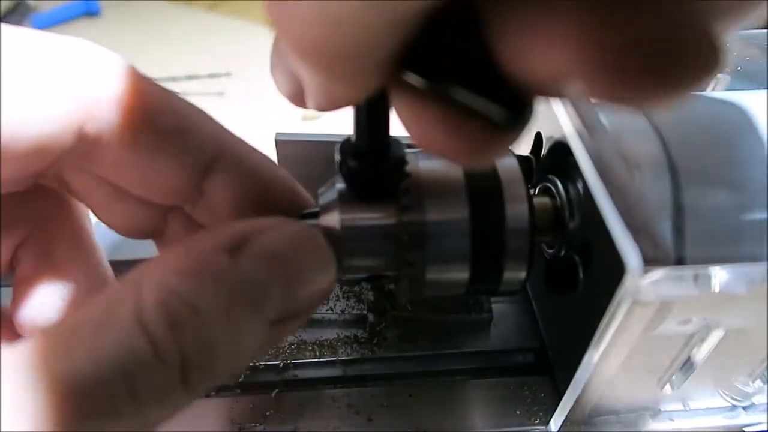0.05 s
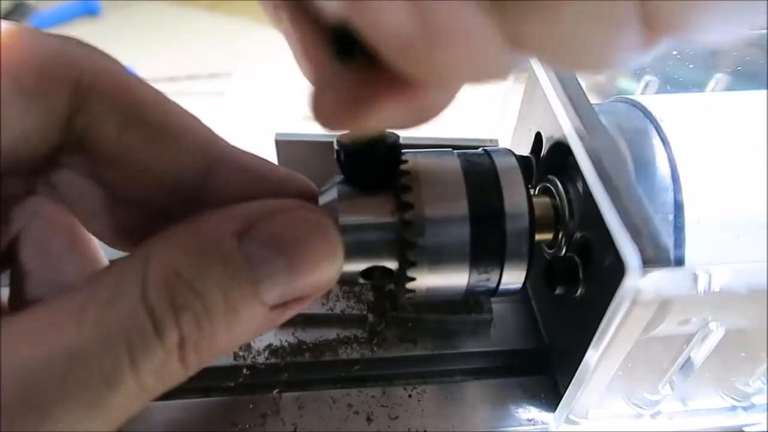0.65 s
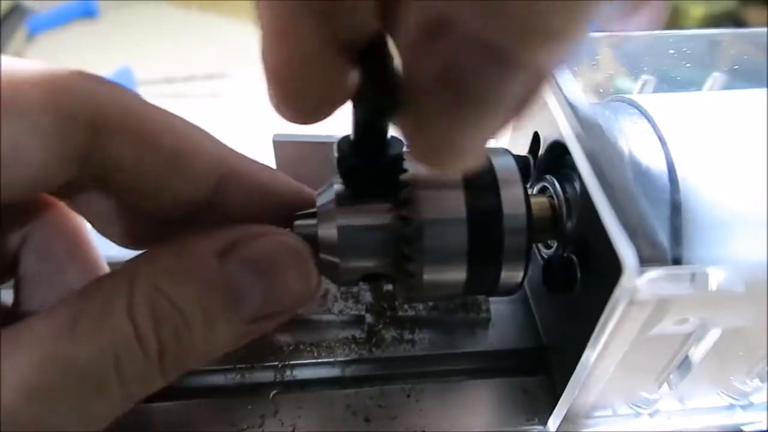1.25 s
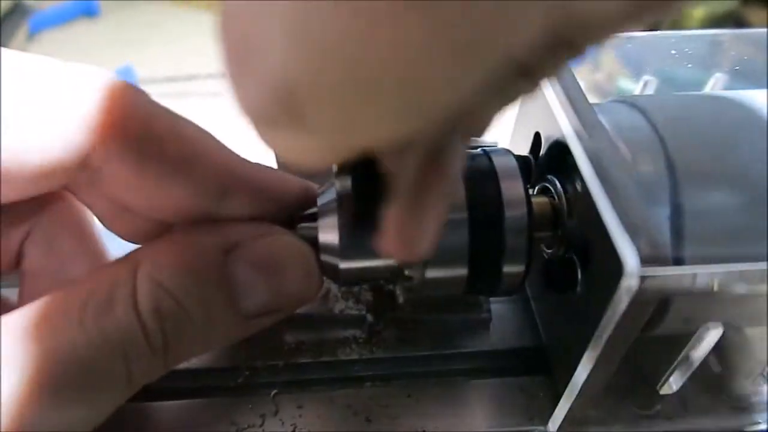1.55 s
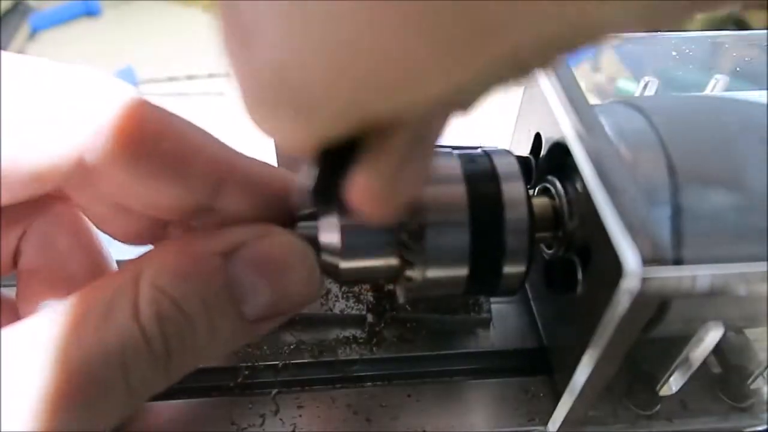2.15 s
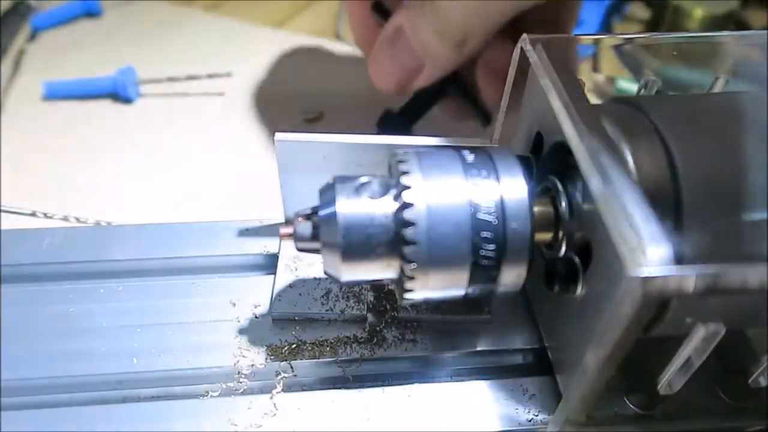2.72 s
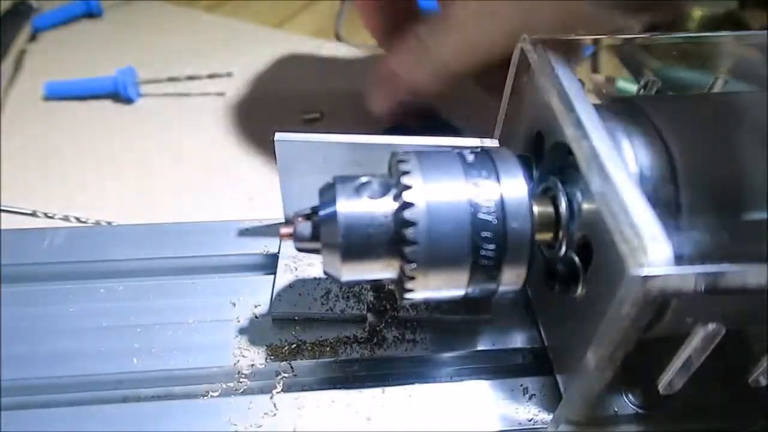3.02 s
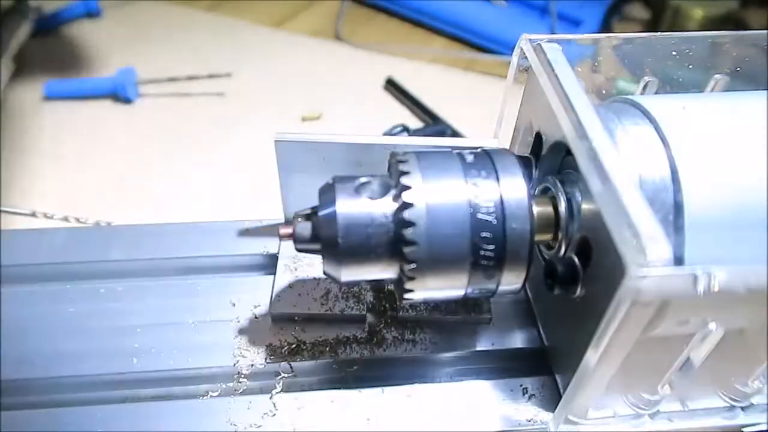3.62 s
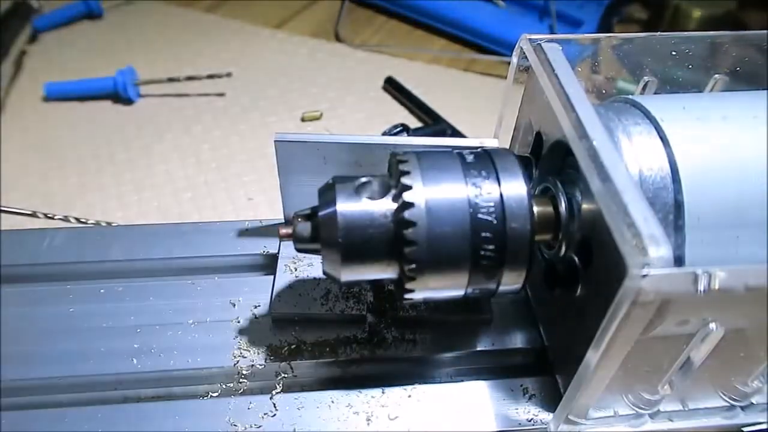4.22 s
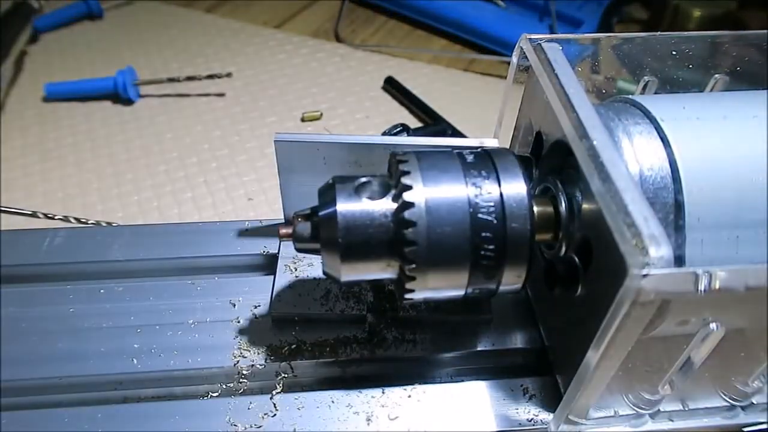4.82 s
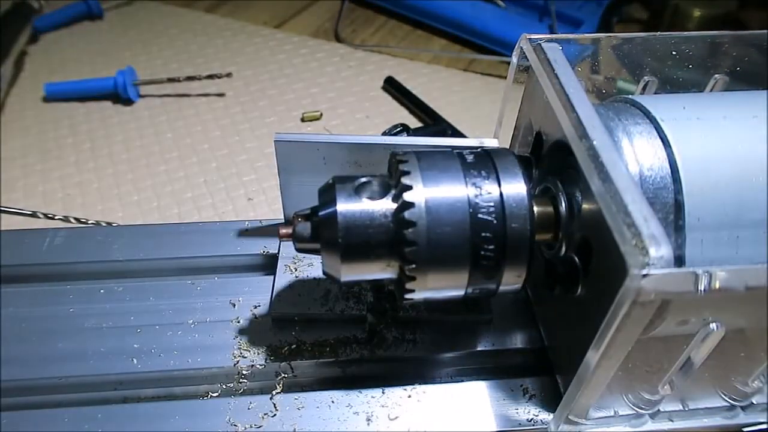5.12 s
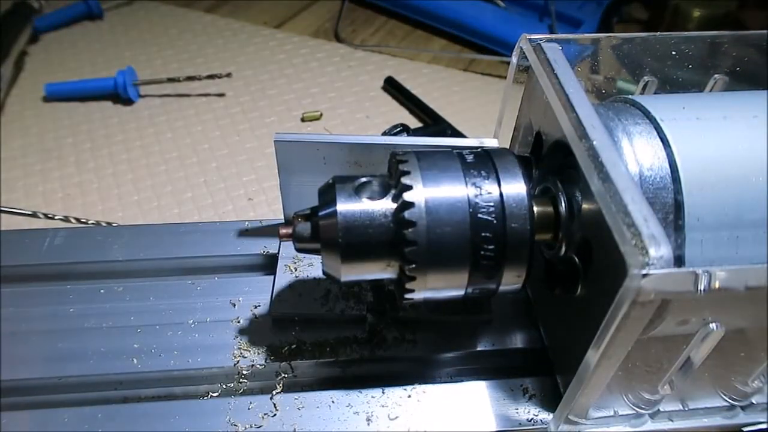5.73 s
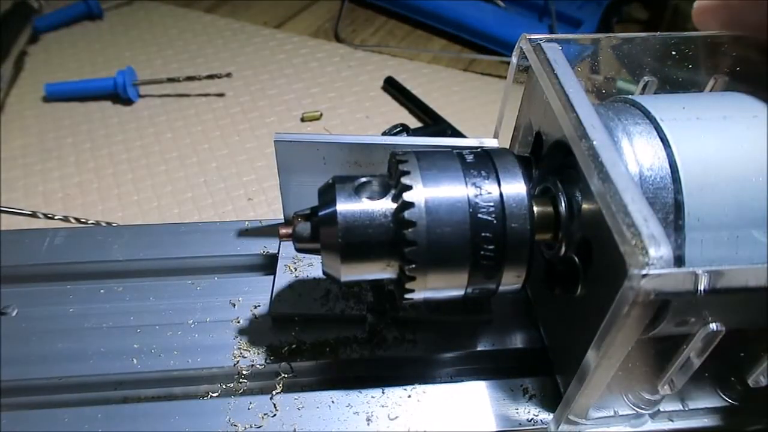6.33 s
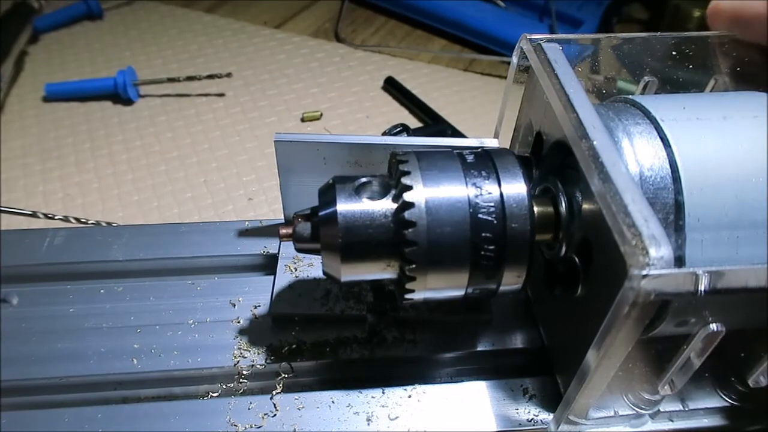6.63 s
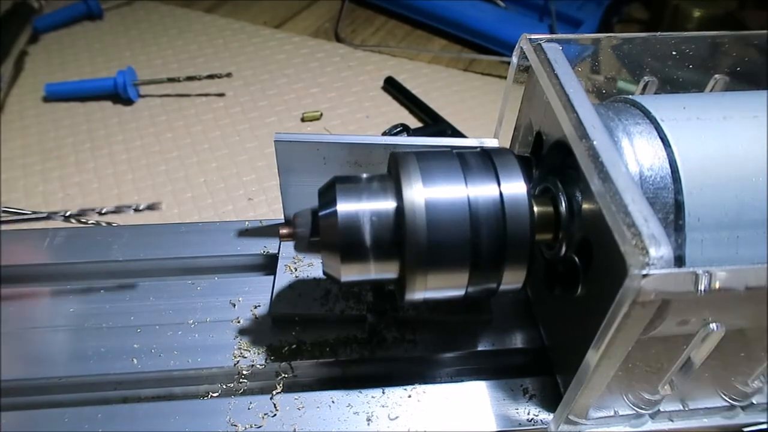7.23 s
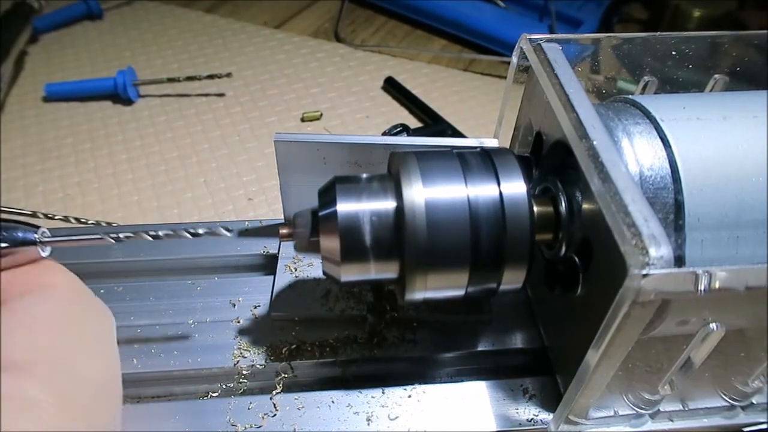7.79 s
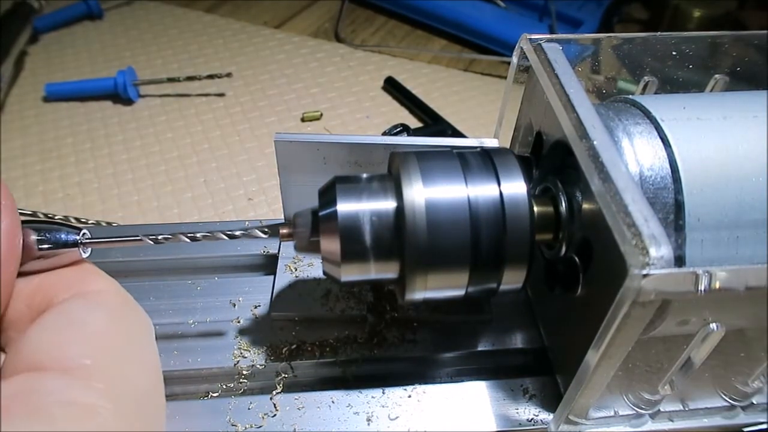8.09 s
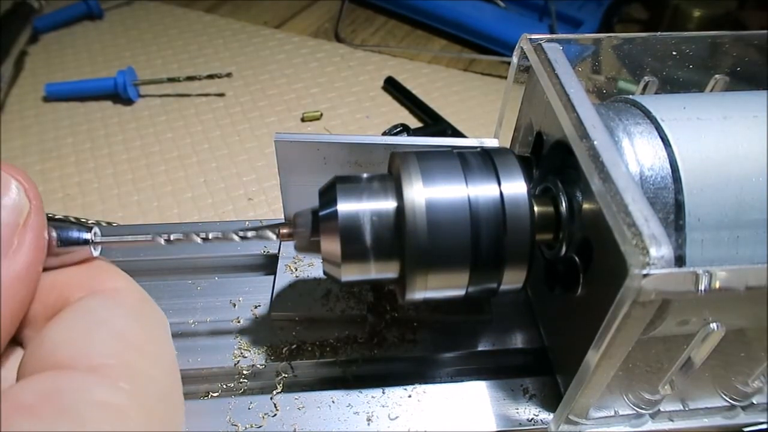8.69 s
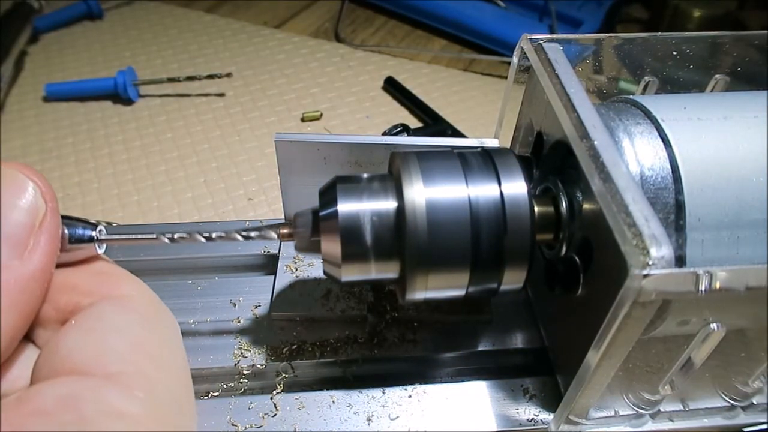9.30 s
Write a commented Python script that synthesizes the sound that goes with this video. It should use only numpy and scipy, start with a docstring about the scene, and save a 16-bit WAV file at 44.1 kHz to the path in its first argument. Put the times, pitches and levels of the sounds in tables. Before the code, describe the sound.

A chuck key clicks, something clatters on a bench, then a small lathe whines up, turns shrill and a drill bit cuts metal.

```python
"""A chuck key clicks, grinds and squeaks as it tightens the chuck of a mini lathe, and is put down.
Something hard clatters on the bench and judders to rest. A switch snaps, the motor starts with a clunk,
its unbalanced shaft hums and its ball bearing whines. Then the scene jumps to fast-forward, so the
whine turns shrill. Last, a hand-held drill bit skates on the spinning pin, bores in and sings."""
import sys
import numpy as np
from scipy import signal
from scipy.fft import rfft, irfft, next_fast_len
from scipy.io import wavfile
from scipy.ndimage import map_coordinates

SR = 44100
rng = np.random.default_rng(int(sys.argv[2]) if len(sys.argv) > 2 else 0)


def put_to_file(sound):
    """Save the sound as 16-bit audio at rate SR, in the file named by the first command-line argument."""
    columns = np.atleast_2d(sound).T  # one column per channel
    safe = np.clip(columns, -1, 1)
    whole_steps = np.round(safe * 32767)
    wavfile.write(sys.argv[1], SR, whole_steps.astype(np.int16))


N = 421155
T = np.arange(N) / SR
HIT_T = T[:SR // 2]  # half a second for each short sound
SIDES = np.array([[1], [-1]])  # left, right

START_S, SPIN_UP_S = 6.871, 0.036  # the motor gets power; time constant of its run-up
FULL_HZ = 130.55  # free shaft speed at normal pace; an "order" is a multiple of the shaft speed
JUMP_S, FAST = 7.581, 4  # start and pace of the fast-forward
CONTACT_S, SEAT_S = 8.54, 8.755  # the bit presses on the pin; it finds its centre and bores
TOP_HZ = 15780  # upper edge of the sound

# Tone colour of the workshop air: f/Hz, level/dB
AIR_COLOUR = [(12, -38), (20, -11.5), (43, 1.5), (115, -8.5), (147, -14.5), (205, -7), (302, -15.5),
              (337, -12), (525, -19), (1420, -27.5), (2770, -34), (3860, -37.5), (12400, -51), (15000, -67)]
# Steady background tones: f/Hz, level/dB
ROOM_HUM = [(53.8, -50.5), (119, -53), (199, -61), (12565, -79.5)]
# The bench top booms after blows: t/s, f/Hz, level/dB, t60/s (time to fade by 60 dB)
BENCH_BOOMS = [(0.294, 99.8, -36, 0.62), (4.654, 97, -28, 0.74), (5.244, 101.7, -27, 1.0)]
# Dull knocks on the bench: t/s, level/dB, f/Hz, t60/s
BENCH_KNOCKS = [(0.295, -17, 125, 0.04), (0.791, -34.5, 227, 0.15), (0.872, -32, 200, 0.14),
                (3.031, -27, 260, 0.057), (3.058, -22.5, 315, 0.1), (4.988, -29.5, 280, 0.05),
                (5.246, -26, 240, 0.19), (5.411, -19.5, 85, 0.036), (5.424, -19, 104, 0.09),
                (6.151, -31.5, 456, 0.062)]
# Light ticks, the last one the motor switch: t/s, level/dB, t60/s
LIGHT_TICKS = [(0.295, -47, 0.018), (0.712, -42.5, 0.031), (0.871, -36.5, 0.014), (2.209, -48, 0.033),
               (2.885, -48, .04), (3.058, -35.5, 0.011), (3.548, -53.5, 0.16), (6.492, -52, 0.15),
               (6.713, -39, 0.022), (6.73, -52, .03), (6.876, -15.5, 0.031)]
# Tone colour of a tick: f/Hz, level/dB
TICK_COLOUR = [(300, -15), (2000, 11), (3300, 9), (5000, 7.5), (8000, 0.5), (12000, -1.5), (15500, -27)]
# Fingers slide on steel and card: t/s, level/dB, width/s, f/Hz
FINGER_RUBS = [(0.5, -66, 0.024, 7000), (0.603, -68, 0.036, 6000), (0.799, -65, 0.03, 2000),
               (1.051, -51, 0.013, 1390), (1.183, -58.5, 0.04, 8000), (2.441, -63.5, 0.069, 1800),
               (3.788, -60, 0.015, 1390), (3.906, -57, 0.012, 1510), (4.038, -61, 0.025, 6900),
               (4.223, -53, 0.043, 1480), (6.391, -61.5, 0.023, 3150)]
# The key squeaks: t/s, length/s, starting f/Hz, level/dB
KEY_SQUEAKS = [(0.364, 0.025, 3380, -53), (0.873, 0.037, 3320, -40.5), (0.912, 0.023, 4150, -54)]
# The key's teeth hit: t/s, ring level/dB, ring f/Hz, click level/dB, brightness/(dB per octave)
KEY_HITS = [(0.383, -38, 637, -41.5, -2), (0.585, -30.5, 586, -38, -2), (0.611, -38, 685, -46, -4),
            (0.648, -27, 571, -32, -2), (0.776, -24.5, 582, -34.5, 1), (0.803, -32, 560, -39, 1),
            (0.826, -26, 565, -38, 0), (0.869, -35, 640, -37, -3.5), (1.063, -23, 535, -33, -1),
            (1.259, -32.5, 588, -62, -7), (1.518, -34, 550, -40, 2), (2.209, -29.5, 610, -35, 0),
            (2.265, -27.5, 510, -37.5, -3.5)]
# Ringing of spindle and lathe bed: multiple of the ring pitch, level/dB, t60/s
CHUCK_MODES = [(1, 1, 0.051), (1.18, -14, 0.022), (1.68, -12, 0.036), (2.4, -15, 0.017)]
# Tone colour of a steel click: f/Hz, level/dB
CLICK_COLOUR = [(500, 11.5), (1500, 6), (2150, 3), (2900, 0), (3750, 3), (4800, -29), (9000, -35),
                (15000, -36)]
# The turning key grinds: t/s, length/s, level/dB
KEY_GRINDS = [(0.433, 0.15, -56.5), (0.685, 0.06, -61.5), (0.785, 0.062, -51.5), (1.03, 0.054, -59),
              (1.145, 0.19, -67), (2.2, 0.18, -64), (2.98, 0.052, -58)]
# Tone colour of a slipping tooth: f/Hz, level/dB
TOOTH_COLOUR = [(500, 11), (1400, 4), (1800, 2), (2150, 10), (2700, -2), (3150, -9), (3450, 3.5),
                (4150, 0.5), (4800, -17), (9000, -20), (15000, -31)]
# Short clinks; the last two are the ring of the motor's starting clunk: t/s, f/Hz, level/dB, t60/s
SHORT_CLINKS = [(0.777, 2190, -26, 0.032), (2.265, 3630, -40, 0.044), (0.777, 3700, -36, 0.035),
                (0.827, 2210, -41, 0.02), (3.032, 6240, -54, 0.03), (3.057, 3300, -27, 0.014),
                (3.057, 2000, -39, 0.01), (3.06, 5600, -39, 0.015), (3.062, 2950, -43, 0.064),
                (4.654, 2860, -25, 0.23), (4.865, 4940, -27, 0.036), (4.865, 3000, -29, 0.03),
                (5.152, 3500, -51, 0.093), (5.243, 1470, -19, 0.054), (5.402, 3240, -31, 0.05),
                (6.492, 3140, -43, 0.058), (6.891, 1130, -18.5, 0.093), (6.912, 1070, -18.5, .07)]
# Hard blows and clunks; the last two are the motor's clunk as it starts:
# t/s, level/dB, brightness/(dB per octave), rattle t60/s, lowest f/Hz
BLOWS_AND_CLUNKS = [(3.774, -44.5, -1.5, 0.04, 500), (4.653, -9, 1.5, 0.075, 100),
                    (4.661, -17, 0, 0.05, 300), (4.685, -18.5, -2, 0.07, 100),
                    (4.699, -19.5, 2, 0.032, 100), (4.732, -27, -2.5, 0.05, 300),
                    (4.77, -25.5, -2, 0.04, 100), (4.8, -22, 0.5, 0.055, 100),
                    (4.802, -12.5, -1, 0.057, 100), (4.83, -22, -7, 0.069, 300),
                    (4.887, -21, -1, 0.05, 600), (4.957, -31, 3, 0.17, 400), (5.242, -24.5, 1, 0.31, 900),
                    (5.245, -14, -2.5, 0.06, 900), (5.263, -24, 1.5, 0.05, 900),
                    (5.412, -25, -0.5, 0.06, 500), (5.425, -29, -0.5, .07, 600),
                    (5.481, -35.5, 2.5, 0.13, 600), (6.888, -19, -2, 0.11, 500),
                    (6.911, -22.5, 0.5, .06, 600)]
# Tone colour of a blow or clunk: f/Hz, level/dB
BLOW_COLOUR = [(40, -22), (100, -7), (200, 7), (400, -8), (650, 7), (900, -2.5), (1170, 3.5), (1400, -4.5),
               (2900, -9.5), (5300, -14.5), (7500, -25.5), (11000, -30.5), (15500, -41)]
# Ringing of the bench: f/Hz, level/dB, t60/s
BENCH_MODES = [(664, -17, 0.082), (731, -6.5, 0.099), (980, -19, 0.15), (1187, -11, 0.17), (1380, -10, .18),
               (1606, -16.5, 0.15), (1950, -21, 0.29), (2408, -18, 0.16)]
# Blows that ring the metal object: t/s, level/dB
OBJECT_HITS = [(4.655, -23.5), (4.699, -33), (4.802, -31), (5.245, -38), (5.413, -36), (5.424, -39)]
# Ringing of that object: f/Hz, level/dB, t60/s
OBJECT_MODES = [(2720, -2, 0.13), (3000, -2, 0.16), (3380, -8, 0.25), (3720, -10, 0.17), (4830, -9, 0.17),
                (5020, -10, 0.16), (6200, -21, 0.22), (6550, -17, 0.18)]
# It judders after a bounce: t/s, level/dB
OBJECT_JUDDERS = [(4.689, -28), (4.811, -28.5), (4.832, -28), (4.9, -28.5), (4.955, -30)]
# Hollow tone colour of the judder: f/Hz, level/dB
JUDDER_COLOUR = [(100, -27), (290, -0.5), (420, -10.5), (560, 1), (720, -5), (820, -20), (1000, -5.5),
                 (1100, -4), (1190, 8), (1330, -5.5), (1450, -19), (1620, -4), (1800, -15.5), (2400, -14.5),
                 (5000, -22), (6500, -26), (7800, -43), (15000, -42)]
# Ball-bearing tones: order, level just after the start/dB, level once run in/dB
BEARING_TONES = [(10, -56.0, -48.0), (10.47, -42.0, -72.5), (11, -49.5, -56.5), (12, -56.5, -50.0),
                 (13, -61.5, -55.5), (15, -48.5, -49.5), (16.349, -55.0, -39.5), (17.126, -43.5, -48.0),
                 (17.52, -53.0, -63.5), (18, -50.0, -50.0), (18.559, -50.0, -44.0), (19, -64.5, -51.0),
                 (19.56, -47.0, -42.0), (20, -42.5, -38.5), (20.535, -40.0, -42.5), (21.308, -44, -46.0),
                 (23, -52.0, -49.5), (24.718, -36.0, -32.0), (25.494, -51.0, -39.0), (26, -43.5, -38.5),
                 (26.339, -49.5, -38.0), (27.16, -39.0, -41.0), (27.339, -40.5, -31.5),
                 (27.95, -29.5, -31.0), (28.339, -28.0, -24.5), (28.728, -32.5, -33.5),
                 (29.116, -46.0, -42.5), (29.338, -33.5, -29.5), (29.677, -35.0, -28.5),
                 (29.942, -34.0, -41.5), (30.318, -44.5, -44.5), (30.705, -42.0, -42.0),
                 (33.081, -38.0, -38.0), (33.849, -39.0, -39.0), (34.6, -44.5, -44.5),
                 (34.823, -44.0, -44.0), (42.22, -49.5, -49.5), (43.638, -52.5, -52.5),
                 (49.488, -43.0, -43.0), (50.101, -48.0, -48.0), (54, -51.0, -51.0)]
# Loudness of the bearing's strongest tone: t/s, level/dB
WHISTLE_LEVELS = [(6.945, -60), (6.978, -18), (7.04, -17), (7.11, -19.5), (7.23, -19.5), (7.30, -28.5),
                  (7.39, -27), (7.46, -18), (7.54, -18), (7.62, -23), (8.6, -21.5), (9.05, -23.5),
                  (9.5, -31)]
# Bearing tones that flare briefly: order, t/s, width/s, level/dB
BEARING_FLARES = [(37.85, 6.923, 0.0071, -14.5), (33.081, 6.962, 0.015, -18), (20.4, 6.975, 0.018, -29),
                  (27.901, 7.04, 0.035, -24.5), (21.308, 8, 0.076, -29)]
# Tones of unbalance and the motor's sliding contacts (the pair near 5 beats): order, level/dB
SHAFT_TONES = [(1, -31.1), (2, -42), (4.573, -49), (4.887, -45.5), (5, -39), (5.889, -54), (6.283, -49.5),
               (8, -56), (9, -41), (9.779, -54)]
# Tone colour of rolling balls and motor brushes at normal pace: f/Hz, level/dB
ROLLING_COLOUR = [(30, -23), (200, -21), (450, -14.5), (1300, -11), (1900, -13.5), (2450, -6.5), (2700, -6),
                  (3100, -9), (3330, 1.5), (3520, 4), (3750, 8), (4050, 1.5), (4200, -5), (4500, -3.5),
                  (5300, -10), (8400, -13.5), (12000, -26), (15500, -46)]
# Where the rolling noise peaks: offset from each whole order
BALL_OFFSETS = [0, .339, .677, .901, .56]
# The bit skates on the pin: t/s, length/s, scrape level/dB, hiss level/dB
BIT_SKATES = [(8.359, 0.053, -43.5, -43), (8.439, 0.017, -38.5, -38), (8.549, 0.11, -35, -31),
              (8.68, 0.054, -34, -30), (8.859, 0.12, -59.5, -34.5)]
# Tone colour of the low scrape: f/Hz, level/dB
SCRAPE_COLOUR = [(100, -43), (220, -6.5), (350, 4), (560, -1.5), (790, 5.5), (1000, 0.5), (1500, -18),
                 (3000, -15), (8000, -48)]
# Tone colour of pin and bit while skating: f/Hz, level/dB
SKATE_COLOUR = [(900, -33), (1300, -11), (1600, -23), (1820, -3.5), (2100, -3), (2350, 5.5), (2600, 2),
                (2720, -1), (2880, 4), (3030, -5), (3350, 1.5), (3700, -6), (5000, -7), (7000, -32),
                (14000, -40)]
# The bit shoves the pin sideways: t/s, length/s, boost of order 1/dB, boost of order 2/dB
BIT_SHOVES = [(8.483, 0.034, 0.5, 5), (8.742, 0.03, 5, 7)]
# The pin squeals under the skating bit: t/s, length/s, f/Hz, level/dB
PIN_SQUEALS = [(8.544, 0.008, 2480, -28), (8.559, 0.04, 2370, -28), (8.608, 0.0098, 2500, -27),
               (8.64, 0.014, 2350, -26), (8.668, 0.02, 2400, -26.5), (8.696, 0.047, 2310, -32.5),
               (8.698, 0.045, 2460, -30)]
# Tone colour of chips snapping off: f/Hz, level/dB
CHIP_COLOUR = [(800, -43), (1500, -35), (1820, -11), (2100, 3), (2350, -9), (2600, 0), (2850, -3),
               (3300, 3), (3650, 2), (3950, 4), (4300, 0), (5000, -5), (7000, -38), (14000, -40)]
# The seated bit buzzes: order, level/dB
BIT_BUZZ = [(6, -5), (7, -2.5), (8.93, -1.5), (9.93, -10), (11, -11.5), (12, -12), (13, -6), (14, -7)]
# The bit sings: order, start t/s, peak t/s, peak level/dB, rise/(dB per s), fall/(dB per s), slip/rad
BIT_SONG = [(3, 8.81, 8.9, -42, 29, 31, 0.26), (4, 8.77, 8.92, -36.5, 45, 40.5, 0.66),
            (4.001, 9.12, 9.21, -28.5, 53, 71, 0.18), (5, 8.76, 8.905, -23.5, 63, 72, 0.57),
            (7.94, 8.76, 8.98, -30.5, 52, 128, 0.45), (7.9, 9.06, 9.36, -17.5, 57.5, 15.5, 0.3)]
# How long the workshop echoes: f/Hz, t60/s
ROOM_DECAY = [(100, 0.86), (700, 0.35), (4000, 0.54), (8000, 0.42), (13000, 0.39)]


def amp(db):
    """Decibels to gain."""
    return 10 ** (np.asarray(db) / 20)


def unit(x):
    """Scale to an average strength (rms) of 1."""
    return x / np.sqrt(np.mean(x ** 2) + 1e-20)


def along(points, hz):
    """Read between (Hz, value) points on a log axis."""
    f, v = np.transpose(points)
    return np.interp(np.log(hz + 1), np.log(f + 1), v)


def wobble(rate, t=T):
    """A smooth random curve through rate points a second."""
    coarse = T[::32]
    points = rng.standard_normal(int(T[-1] * rate) + 4)
    return np.interp(t, coarse, map_coordinates(points, [coarse * rate]))


def rise(start, attack, t=T):
    """A straight ramp from 0 at start to 1 after the attack."""
    return np.clip((t - start) / attack, 0, 1)


def fade(t60, t=HIT_T):
    """Gain that falls 60 dB in t60 seconds."""
    return np.exp(-np.log(1000) * t / t60)


def envelope(start, attack, hold, t60, t=T):
    """Gain that rises, holds and dies away."""
    return rise(start, attack, t) * fade(t60, np.maximum(t - start - attack - hold, 0))


def hump(hz, centre, q):
    """Gain in dB of one resonance; a higher q is narrower."""
    return -10 * np.log10(1 + (q * ((hz + 1) / centre - centre / (hz + 1))) ** 2)


def tilt(hz, db_per_octave):
    """Gain in dB of a brighter or duller contact."""
    return db_per_octave * np.log2(np.clip(hz, 200, 6000) / 1000)


def roll_off(ratio):
    """Gain in dB that drops once a frequency ratio passes 1."""
    return -10 * np.log10(1 + ratio ** 4)


def filtered(x, gain):
    """x times a gain that depends on frequency."""
    n = x.shape[-1]
    padded = next_fast_len(n + 4096, True)
    return irfft(rfft(x, padded) * gain(np.fft.rfftfreq(padded, 1 / SR)), padded)[..., :n]


def noise(colour, size=N):
    """Noise of rms 1 whose tone colour in dB is colour(Hz)."""
    return unit(filtered(rng.standard_normal(size), lambda hz: amp(colour(hz))))


def burst(colour, t60):
    """Coloured noise that starts at once and dies away."""
    return noise(colour, len(HIT_T)) * fade(t60)


def ring(modes, t=HIT_T):
    """A body's own fading tones (modes), struck at new strengths each time."""
    strengths = amp(rng.uniform(-2, 2, len(modes)))
    return sum(gain * amp(db) * fade(t60, t) * np.sin(2 * np.pi * hz * t)
               for gain, (hz, db, t60) in zip(strengths, modes))


def struck(contacts, colour):
    """A body with this tone colour rings after each contact, never before (minimum phase)."""
    def response(hz):
        cepstrum = irfft(np.log(amp(colour(hz))))
        return np.exp(rfft(cepstrum * (1 + np.sign(np.fft.fftfreq(len(cepstrum))))))
    return filtered(contacts, response)


def grit(colour, per_s, spread_db, size=N):
    """Irregular little snaps of uneven strength ring a body; rms 1."""
    snaps = (rng.random(size) < per_s / SR) * np.sign(rng.standard_normal(size))
    strengths = amp(spread_db * np.minimum(rng.standard_normal(size), 2))
    return unit(struck(snaps * strengths, colour))


def background():
    """Rumble, hum and faint ticking; only a pitched-up rumble outlasts the jump to fast-forward."""
    rumble_db = 2 + 1.5 * wobble(1.96) - 25 * rise(START_S, SPIN_UP_S)  # drops as the motor starts
    hum = sum(amp(db) * np.sqrt(2) * np.sin(2 * np.pi * hz * T + 0.91 * wobble(14))
              for hz, db in ROOM_HUM)
    air = amp(-48 + 0.33 * wobble(3.4)) * noise(lambda hz: along(AIR_COLOUR, hz))
    air += (amp(rumble_db) - 1) * filtered(air, lambda hz: 1 / (1 + (hz / 85) ** 4))
    # bass is alike left and right, the rest is spread out
    side = amp(-51) * noise(lambda hz: along(AIR_COLOUR, hz) + roll_off(170 / (hz + 1)))
    ticking = amp(-71) * unit(amp(6 * wobble(90))) * noise(lambda hz: 2 * hump(hz, 3640, q=2.7))
    fast_rumble = amp(-61) * noise(lambda hz: 2 * hump(hz / FAST, 53.3, q=4))
    return np.where(T < JUMP_S, air + SIDES * side + hum + ticking, fast_rumble)


def booms():
    """The struck bench top rings with one low tone."""
    out = np.zeros(N)
    for s, hz, db, t60 in BENCH_BOOMS:
        add(out, s, ring([(hz, db, t60)]))
    return out


def handling():
    """Dull knocks, sharp ticks and sliding fingers, each a short puff of noise."""
    out = np.zeros(N)
    for s, db, centre, t60 in BENCH_KNOCKS:
        knock = burst(lambda hz: 2 * hump(hz, centre, q=1) + hump(hz, 160, q=0.23), t60)
        add(out, s, amp(db) * knock * (1 - np.exp(-HIT_T / 0.00074)))
    for s, db, t60 in LIGHT_TICKS:
        add(out, s, amp(db) * burst(lambda hz: along(TICK_COLOUR, hz), t60))
    middle = HIT_T.mean()
    for s, db, width, centre in FINGER_RUBS:
        stroke = np.exp(-.5 * ((HIT_T - middle) / width) ** 2) * amp(3.2 * wobble(204, HIT_T))
        add(out, s - middle, amp(db) * stroke * noise(lambda hz: hump(hz, centre, q=2.7), len(HIT_T)))
    return out


def squeaks(glide_hz_per_s=2500):
    """The key squeaks in its hole with a rising, shaky pitch."""
    out = np.zeros(N)
    for s, length, hz, db in KEY_SQUEAKS:
        pitch = (hz + glide_hz_per_s * HIT_T) * (1 + 0.0064 * wobble(300, HIT_T))
        swell = np.sin(np.pi * rise(0, length, HIT_T)) ** 2
        add(out, s, amp(db) * swell * np.sin(2 * np.pi * np.cumsum(pitch) / SR))
    return out


def chuck_key(bend=0.21, bend_s=0.0029):
    """Each tooth contact clicks and rings the spindle; the turning key grinds in tiny slips."""
    out = np.zeros(N)
    settling = HIT_T + bend * bend_s * (1 - np.exp(-HIT_T / bend_s))  # each ring starts a little high
    for s, ring_db, pitch, click_db, bright in KEY_HITS:
        modes = [(multiple * pitch, db, t60) for multiple, db, t60 in CHUCK_MODES]
        add(out, s, amp(ring_db) * ring(modes, settling) * (1 - np.exp(-HIT_T / 0.0031)))
        click = burst(lambda hz: along(CLICK_COLOUR, hz) + tilt(hz, bright), t60=0.053)
        add(out, s, amp(click_db) * click)
    turning = sum(amp(db) * envelope(s, 0.014, length, t60=0.1) for s, length, db in KEY_GRINDS)
    return out + turning * grit(lambda hz: along(TOOTH_COLOUR, hz), per_s=90, spread_db=3)


def clinks():
    """Short clinks and the ring of the motor's clunk, each a narrow band of noise."""
    out = np.zeros(N)
    for s, centre, db, t60 in SHORT_CLINKS:
        add(out, s, amp(db) * burst(lambda hz: 2 * hump(hz, centre, q=6.8), t60))
    return out


def clatter(crack_db=14, dull_hz=8000):
    """Hard blows and the motor's clunk crack, rattle and ring; some blows ring the metal object."""
    out = np.zeros(N)
    for s, db, bright, t60, lowest in BLOWS_AND_CLUNKS:
        low_cut = lambda hz: roll_off(lowest / (hz + 1))
        colour = lambda hz: along(BLOW_COLOUR, hz) + tilt(hz, bright) + low_cut(hz)
        crack = struck(1. * (HIT_T == 0), colour)
        duller = lambda hz: colour(hz) + roll_off(hz / dull_hz)
        rattle = grit(duller, per_s=900, spread_db=3, size=len(HIT_T)) * fade(t60)
        bench = ring([(hz, level + low_cut(hz), life) for hz, level, life in BENCH_MODES])
        tail = 0.7 * rattle + 0.89 * burst(colour, t60=0.038) + 0.61 * bench
        tail *= 1 - np.exp(-HIT_T / 0.00053)
        add(out, s, amp(db) * (amp(crack_db) * crack / np.linalg.norm(crack) + tail))
    for s, db in OBJECT_HITS:
        for centre, level, t60 in OBJECT_MODES:  # rattling smears each tone into a narrow band
            add(out, s, amp(db + level) * burst(lambda hz: 2 * hump(hz, centre, q=28), t60))
    return out


def judder(attack_s=0.0035, rest_s=4.997):
    """The object shakes over the bench after each bounce, then lies still."""
    bounces = sum(amp(db) * envelope(s, attack_s, hold=0.013, t60=0.21) for s, db in OBJECT_JUDDERS)
    moving = 1 - rise(rest_s, attack_s)
    return bounces * moving * amp(1.8 * wobble(150)) * noise(lambda hz: along(JUDDER_COLOUR, hz))


def shaft_speed(t):
    """Turns a second at normal pace: the motor runs up, then slows as the bit seats and is fed in."""
    run_up = 1 - np.exp(-np.maximum(t - START_S, 0) / SPIN_UP_S)
    sag = 0.33 * rise(CONTACT_S, SEAT_S - CONTACT_S, t) ** 2 + 2.4 * np.maximum(t - SEAT_S, 0) ** 2
    return FULL_HZ * run_up - sag


def late_db(order, t):
    """The highest orders only ring once the shaft is nearly up to speed."""
    return -250 * np.maximum(1 - shaft_speed(t) / FULL_HZ, 0) * (order > 36)


def bearing_whine(t, tone, pace, run_in, feed):
    """Many tones follow the shaft, swell as they near the housing's resonance and weaken under feed."""
    speed, whine = shaft_speed(t), 0
    housing = lambda hz: hump(hz, 4100, q=6.6)
    for order, cold_db, warm_db in BEARING_TONES:
        if order * FULL_HZ * pace < SR / 2:
            housing_db = np.minimum(housing(order * speed) - housing(order * FULL_HZ), 0)
            db = (warm_db if run_in else cold_db) + housing_db + late_db(order, t) - 2 * feed
            whine += amp(db) * tone(order, unsteady_db=3, drift=0.3)
    return whine


def bearing_whistle(t, tone, main_order=28.901):
    """The bearing's strongest tone comes and goes; a few others flare for a moment."""
    level_db = np.interp(t, *np.transpose(WHISTLE_LEVELS))
    whistle = amp(level_db) * tone(main_order, unsteady_db=1.5, drift=0.16)
    for order, s, width, db in BEARING_FLARES:
        whistle += amp(db) * np.exp(-.5 * ((t - s) / width) ** 2) * tone(order, unsteady_db=0, drift=0.1)
    return whistle


def motor_hum(t, tone, settle_s=0.61):
    """The shaft's hum starts weak and settles; the bit's sideways push changes single tones."""
    seated = rise(SEAT_S, 0.016, t)
    change_db = {1: 3 * seated, 2: 7 - 3.5 * seated, 4.887: 5 * seated, 5: -seated,  # by order
                 9: -7 * rise(CONTACT_S, 0.05, t) + 1.5 * wobble(60, t)}
    for s, length, first_db, second_db in BIT_SHOVES:
        shove = envelope(s, 0.016, length, 0.17, t)
        change_db[1] += first_db * shove
        change_db[2] += second_db * shove
    hum_db = 1.5 - 9.5 * np.exp(-(t - START_S) / settle_s)
    return sum(amp(db + hum_db + change_db.get(order, 0)) * tone(order, unsteady_db=1.16, drift=0.17)
               for order, db in SHAFT_TONES)


def rolling_balls(t, angle, pace, feed):
    """Rolling noise repeats with the shaft; a wide hiss around it grows as the bit is fed in."""
    def comb(hz):
        offset = (hz / FULL_HZ - np.array(BALL_OFFSETS)[:, None] + .5) % 1 - .5
        peaks = np.exp(-(offset / 0.011) ** 2).sum(0)
        return 10 * np.log10(0.097 + peaks) - 100 * (hz * pace > TOP_HZ)

    colour = lambda hz: along(ROLLING_COLOUR, hz / pace)
    position = angle / (2 * np.pi * FULL_HZ) * SR  # the shaft's angle moves us through the noise
    rolling = map_coordinates(noise(comb), [position], mode="wrap")
    once_a_turn = 1 + .35 * np.sin(angle)
    rolling = unit(filtered(rolling, lambda hz: amp(colour(hz)))) * once_a_turn
    return rolling + 0.15 * SIDES * noise(colour, len(t)) + amp(-14.5 + 14 * feed) * noise(colour, len(t))


def bearing_skid(t, tone, start_s, order=64):
    """The bearing skids as the motor pulls up: a hiss and a hoarse, rising whistle."""
    hiss = noise(lambda hz: 2.2 * hump(hz, 3800, q=6), len(t))
    whistle = amp(-7.5 + late_db(order, t)) * wobble(260, t) * tone(order, unsteady_db=0, drift=0.5)
    return amp(-16.5) * envelope(start_s, attack=0.025, hold=0.044, t60=0.46, t=t) * (hiss + whistle)


def fluttering(t, pace):
    """A fluttering tone builds up once the motor has run a while; the seated bit damps it."""
    level = amp(-34.5 - 7 * rise(CONTACT_S, SEAT_S - CONTACT_S, t)) * rise(start=7.46, attack=0.46, t=t)
    return level * noise(lambda hz: 2 * hump(hz / pace, 819, q=82), len(t))


def lathe(pace, heard, run_in, whine_db, rolling_db):
    """All sounds of the running spindle during the samples heard, with frequencies times pace."""
    t = T[heard]
    speed = shaft_speed(t) * (1 + 0.00027 * wobble(40, t))
    angle = 2 * np.pi * pace * np.cumsum(speed) / SR
    turning_s = START_S + 0.012
    feed = rise(CONTACT_S, T[-1] - CONTACT_S, t)  # how hard the bit is pushed in, 0 to 1

    def tone(order, unsteady_db, drift):
        swell = amp(unsteady_db * wobble(6 * pace, t))
        lag = SIDES * order * (rng.uniform(-0.0033, 0.0017) - .0065)  # phase differs left and right
        phase = order * angle + lag + drift * wobble(7 * pace, t) + rng.uniform(0, 2 * np.pi)
        return np.sqrt(2) * swell * np.sin(phase)

    whine = amp(whine_db) * bearing_whine(t, tone, pace, run_in, feed)
    whistle = bearing_whistle(t, tone)
    hum = motor_hum(t, tone)
    flutter = fluttering(t, pace)
    rolling = amp(rolling_db) * rolling_balls(t, angle, pace, feed)
    skid = bearing_skid(t, tone, turning_s)
    out = np.zeros((2, N))
    out[:, heard] = flutter + skid + rise(turning_s, 0.038, t) * (hum + whistle + whine + rolling)
    return out


def cutting(t, angle, attack_s=0.016, fade_db_per_s=11):
    """The bit's edges catch and snap free, biting twice a turn; boring gets smoother with depth."""
    boring = rise(SEAT_S, attack_s, t)
    boring *= amp(1.7 * wobble(28, t) - fade_db_per_s * np.maximum(t - SEAT_S, 0))
    scrape, skate = amp(-57) * boring, 0
    for s, length, scrape_db, hiss_db in BIT_SKATES:
        touch = envelope(s, attack_s, length, 0.08, t)
        scrape += amp(scrape_db) * touch
        skate += amp(hiss_db) * touch
    bite = unit(amp(2.1 * wobble(120, t)) * (1 + .6 * np.sin(2 * angle)))
    snaps = lambda colour: grit(lambda hz: along(colour, hz), per_s=3600, spread_db=2.5, size=len(t))
    scraping = scrape * snaps(SCRAPE_COLOUR) + skate * snaps(SKATE_COLOUR)
    chips = amp(-34.5) * boring * snaps(CHIP_COLOUR)
    return filtered(bite * (scraping + chips), lambda hz: hz ** 3 / (hz ** 3 + 200 ** 3))


def pin_squeal(t):
    """The pin squeals in short, wavering fits under the skating bit."""
    out = 0
    for s, length, hz, db in PIN_SQUEALS:
        level = amp(db + 2 * wobble(150, t)) * envelope(s, 0.0036, length, 0.03, t)
        pitch = hz * (1 + 0.0102 * wobble(150, t))
        out += level * np.sin(2 * np.pi * np.cumsum(pitch) / SR)
    return out


def bit_song(t, angle, flutter_db_per_rad=6.5):
    """The seated bit sings and buzzes in step with the shaft; the more it slips, the more it flutters."""
    def chatter(order, slip):
        wave = np.sin(order * angle + slip * wobble(110, t))
        return wave * amp(flutter_db_per_rad * slip * np.minimum(wobble(55, t), 1))

    song = 0
    for order, start_s, peak_s, db, up, down, slip in BIT_SONG:
        level_db = db - up * np.maximum(peak_s - t, 0) - down * np.maximum(t - peak_s, 0)
        song += rise(start_s, 0.016, t) * amp(level_db) * chatter(order, slip)
    buzz = sum(amp(db) * chatter(order, slip=0.8) for order, db in BIT_BUZZ)
    return song + amp(-37.5) * rise(SEAT_S, 0.29, t) * buzz


def drill():
    """All sounds of the bit on the pin, which spins at fast-forward pace."""
    heard = T > BIT_SKATES[0][0]
    t = T[heard]
    angle = 2 * np.pi * FAST * np.cumsum(shaft_speed(t)) / SR
    out = np.zeros(N)
    out[heard] = cutting(t, angle) + pin_squeal(t) + bit_song(t, angle)
    return out


def add(track, s, sound):
    """Mix a sound in at time s."""
    part = track[round(s * SR):][:len(sound)]
    part += sound[:len(part)]


def room(x):
    """The workshop's echo: a tail of fading noise that differs left and right."""
    hz, t, bands = signal.stft(rng.standard_normal((2, SR // 2)), SR, nperseg=256)
    mid, side = signal.istft(bands * fade(along(ROOM_DECAY, hz)[:, None], t), SR, nperseg=256)[1]
    side = filtered(side, lambda hz: hz / (hz + 200))
    tail = (mid + 0.5 * SIDES * side) / np.linalg.norm(mid)
    return signal.fftconvolve(x[None], tail, axes=1)[:, :N]


def scene():
    """Everything is close and near the centre; the room answers the blows most."""
    near = chuck_key() + handling()
    small = clinks() + booms() + squeaks()
    blows = clatter() + judder()
    bit = drill()
    spin_up = lathe(1, (T > START_S) & (T < JUMP_S), run_in=False, whine_db=-1, rolling_db=-26)
    racing = lathe(FAST, T >= JUMP_S, run_in=True, whine_db=-1.3, rolling_db=-24.5)
    motor = spin_up * amp(-.6 * SIDES) + racing * amp(-.2 * SIDES)
    echo = room(amp(-10) * near + amp(-18.5) * small + amp(-8.5) * blows + amp(-21) * bit)
    return near + small + blows + motor + bit + echo + background()


def record(dry):
    """Cut the highest treble and thin out the deepest bass."""
    treble_cut = lambda hz: np.clip((TOP_HZ - hz) / 150 + .5, 0, 1)
    return filtered(dry, lambda hz: treble_cut(hz) * hz ** 3 / (hz ** 3 + 28 ** 3))


dry = scene()
out = record(dry)
put_to_file(out)
```